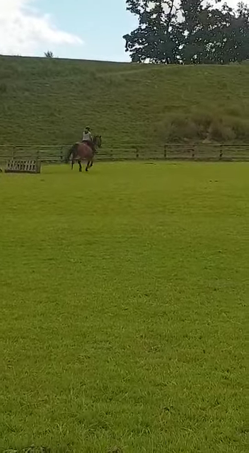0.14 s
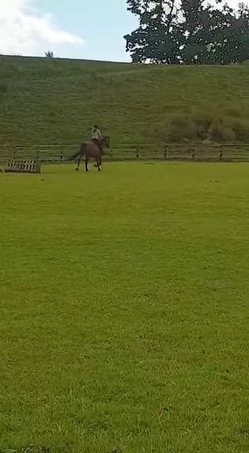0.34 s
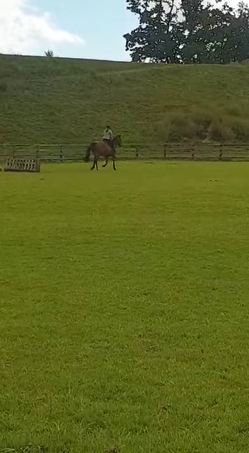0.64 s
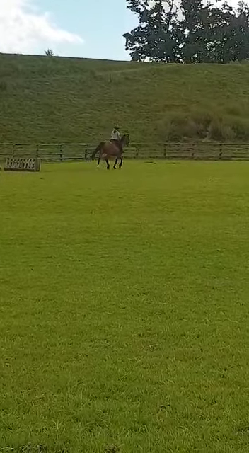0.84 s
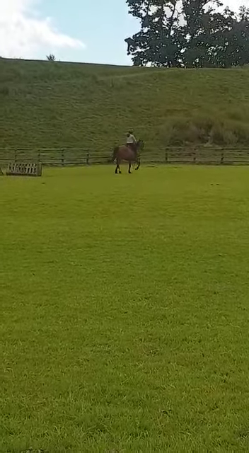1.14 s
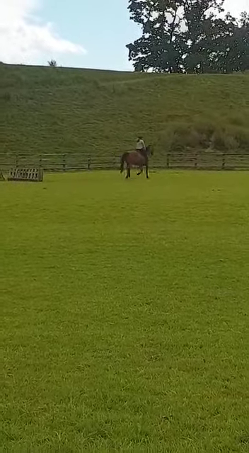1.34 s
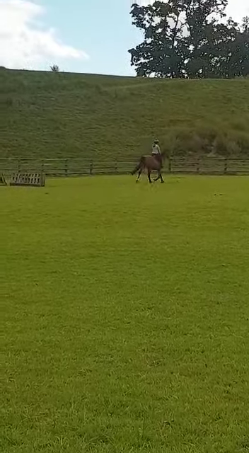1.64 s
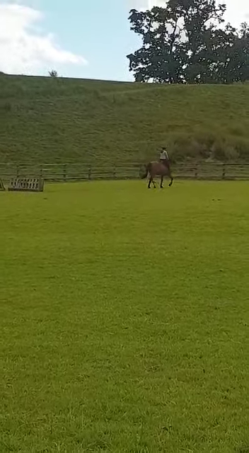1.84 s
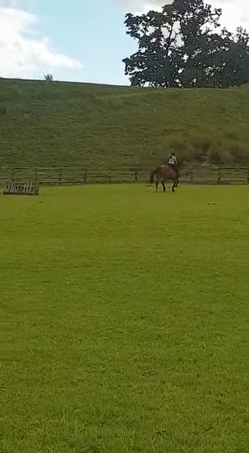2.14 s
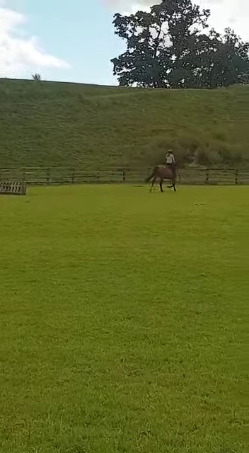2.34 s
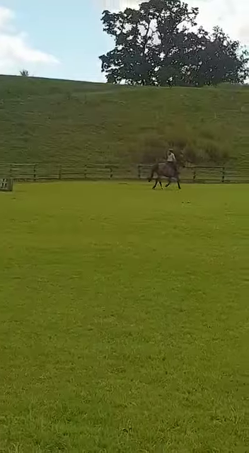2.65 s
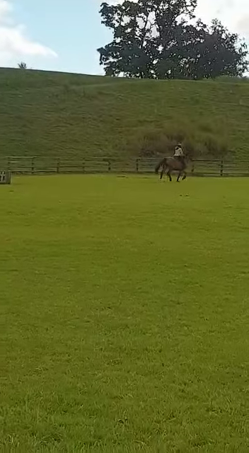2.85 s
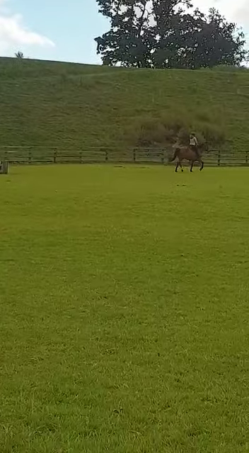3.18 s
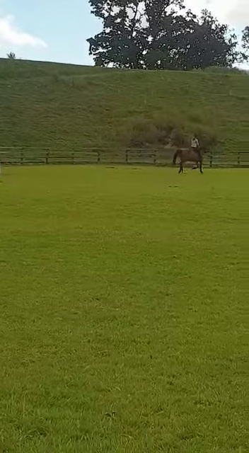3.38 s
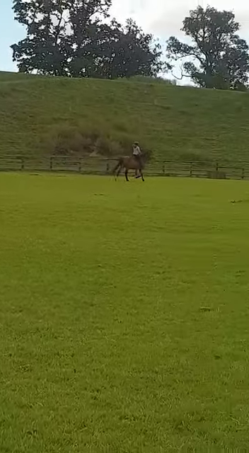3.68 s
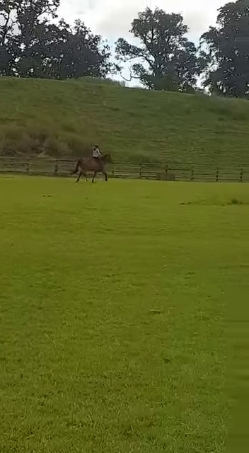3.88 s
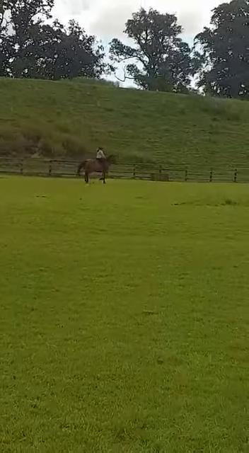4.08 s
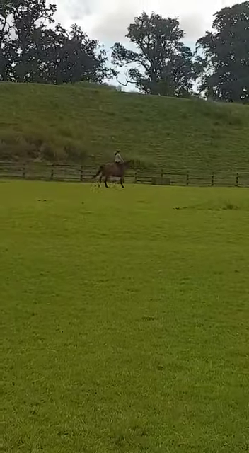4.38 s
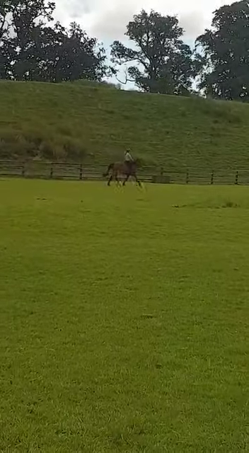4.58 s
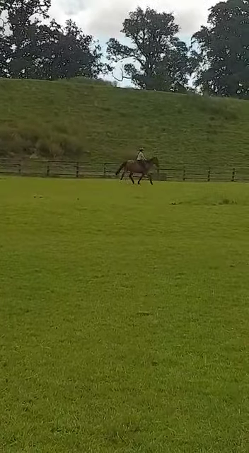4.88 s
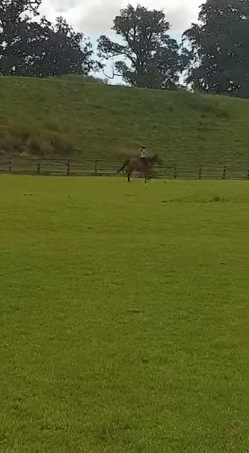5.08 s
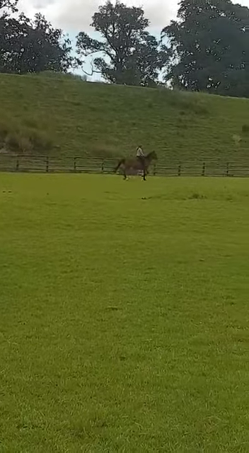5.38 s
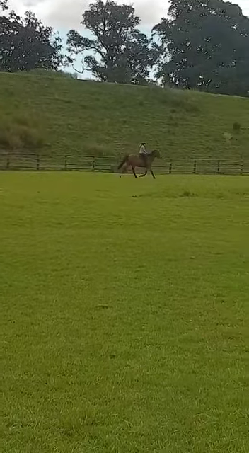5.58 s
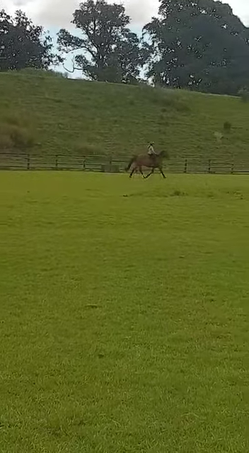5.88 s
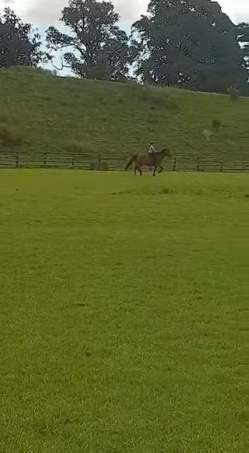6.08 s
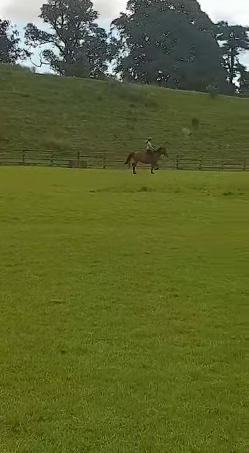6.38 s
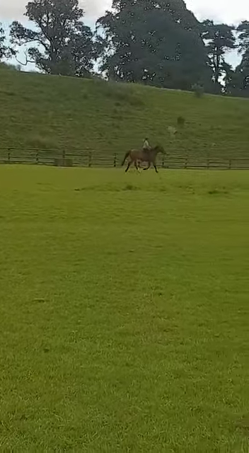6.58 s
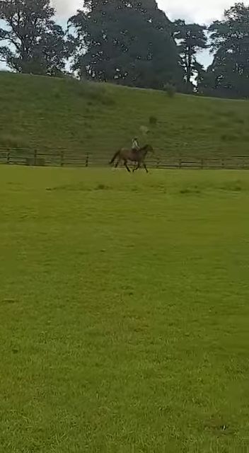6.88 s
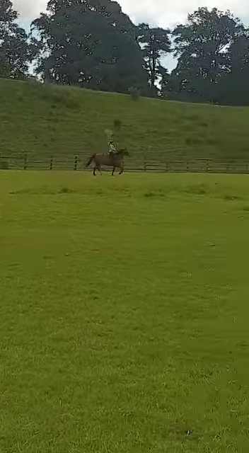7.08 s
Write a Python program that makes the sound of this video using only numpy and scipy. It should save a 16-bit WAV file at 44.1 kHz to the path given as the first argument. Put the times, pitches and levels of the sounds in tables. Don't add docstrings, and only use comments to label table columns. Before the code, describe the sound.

Open-field air roars softly over deep rumble while birds tsip and trill, a distant vehicle pulls away, and a sleeve scuffs the microphone.

```python
import sys
import numpy as np
from scipy import signal
from scipy.fft import rfft, irfft, next_fast_len
from scipy.io import wavfile
from scipy.ndimage import uniform_filter1d, map_coordinates

SR = 44100
rng = np.random.default_rng(int(sys.argv[2]) if len(sys.argv) > 2 else 0)


def generate_wav(sig):
    pcm = np.round(np.clip(np.atleast_2d(sig).T, -1, 1) * 32767).astype(np.int16)
    wavfile.write(sys.argv[1], SR, pcm)


def magnitude_from_level(level_db):
    exponent = np.asarray(level_db, float) / 20
    return 10 ** exponent


N = 318843

# freq_hz, level_db_per_hz
RUMBLE = [(11, -51), (18, -33), (31, -17), (42, -8), (58, -2.5), (72, -0.5), (97, -9), (130, -16.5),
          (170, -39), (290, -120)]
BODY = [(56, -27.5), (95, -1.5), (130, -4), (204, -3.5), (247, -12), (301, -12.5), (392, -15), (480, -13),
        (620, -40.5), (1060, -120)]
RUSH = [(240, -40.5), (400, -18), (450, -13.5), (550, -1), (656, 2.5), (768, 4.5), (960, -2.5), (1250, -24),
        (2110, -120)]
UPPER = [(560, -45), (850, -10), (960, -2.5), (1050, 0), (1300, -6), (1800, -13), (2070, -18), (2330, -28),
         (2600, -37.5), (3300, -66)]
# freq_hz, level_db_per_hz
LEAVES = [(1900, -38.5), (2350, -6.5), (2550, -2.5), (2750, -1), (2950, -5.5), (3200, -17.5), (3600, -21),
          (4500, -62)]
# colour, plain_db, growth_db_per_db of wind, gust_db, patch_db
AIR_LAYERS = [
    (RUMBLE, -45.5, .2, .3, .8),
    (BODY, -50.5, .25, .2, .6),
    (RUSH, -43.5, 1.05, .3, .7),
    (UPPER, -49, .4, .3, .6),
    (LEAVES, -77, .9, .3, 1.2),
]
# freq_hz, left_right_likeness
FAR_ALIKE = [(60, .995), (170, .99), (340, .93), (690, .96), (1030, .9), (1550, .84), (2050, .74),
             (2450, .3), (3500, .2), (6000, .08)]
# freq_hz, left_minus_right_db
FAR_LEAN = [(60, 1.9), (200, -0.5), (400, 6.5), (700, 1.5), (860, -1), (1050, 4), (1600, 1), (2200, 5),
            (2580, 11.5), (3000, 5), (5000, 3.5)]
# time_s, level_db
WIND = [(0, -43), (.6, -43.5), (1.2, -45), (1.7, -47), (2.05, -46), (2.5, -44), (3, -44.5), (3.4, -44.5),
        (3.75, -41.5), (4.15, -44.5), (4.8, -43.5), (5.1, -42), (5.42, -41), (5.75, -41), (6.05, -43.5),
        (6.7, -45.5), (7.23, -45.5)]
# centre_s, length_s, level_db
BOUGHS = [
    (0.023, 0.22, -84),
    (.4, 0.23, -75),
    (1.17, 0.96, -82),
    (3.12, 0.22, -71),
    (3.28, 0.14, -73),
    (3.8, 0.28, -82),
    (5.25, 0.34, -70.5),
    (5.519, 0.066, -81),
    (5.84, 0.1, -76.5),
]

# time_s, firing_hz, level_db
ENGINE = [(0, 62.9, -57), (.4, 62.1, -44), (.7, 59.63, -52), (.95, 61.23, -43.5), (1.5, 60.55, -42),
          (1.75, 60.6, -60), (2.5, 59.6, -52), (3, 59.86, -42), (3.7, 61.7, -48.5), (4.1, 56.8, -48),
          (4.6, 51.06, -71), (4.8, 51.76, -42.5), (5.16, 54.4, -37), (5.75, 67.2, -47), (6.05, 69.43, -51),
          (6.2, 69.86, -38), (6.5, 73.1, -43), (6.7, 75.4, -56)]
# centre_s, length_s, firing_hz, level_db
ENGINE_SWELLS = [
    (2.635, 0.16, 73, -38),
    (7.084, 0.45, 64, -42.5),
]
# freq_hz, level_db_per_hz
TYRES = [(380, -42.5), (500, -8), (600, -2), (690, 4), (800, -4.5), (900, -16), (1200, -23.5),
         (2050, -24.5), (2400, -45.5), (3500, -120)]

# freq_hz, level_db_per_hz
CLOTH_BRIGHT = [(4410, -33), (7500, -18.5), (9530, -12), (10800, -4.5), (11900, -6.5), (12900, -1),
                (15000, 0), (15800, -11)]
# freq_hz, level_db_per_hz
CLOTH_DULL = [(1410, -19.5), (2100, 0.5), (3260, -7.5), (4270, -7), (6090, -2.5), (8500, -16),
              (11000, -35.5), (18700, -120)]
# freq_hz, level_db_per_hz
SCRAPE = [(900, -40), (1600, -1), (2500, -3), (4000, 1), (5500, -10), (8000, -40)]
# hardest_s, level_db, rise_s, fall_s, drag_over_level_db
STROKES = [(1.23, -81, .14, 0.11, -4), (2.8, -85, 0.067, 0.14, 0), (2.96, -68.5, 0.099, 0.14, 1),
           (3.5, -81, 0.29, 0.23, 0), (3.64, -56.5, 0.15, 0.072, 0.5), (3.73, -69.5, 0.086, .2, -4),
           (3.9, -67, 0.13, 0.26, -1), (3.99, -65, 0.07, .1, -4), (4.032, -48.5, 0.018, 0.05, -4),
           (4.053, -47.5, 0.05, 0.035, -1), (4.068, -48.5, 0.03, 0.016, 4), (4.1, -66, .03, 0.11, -1),
           (6.724, -71.5, 0.12, 0.47, 0), (6.97, -61, 0.02, 0.22, 3.5), (7.01, -64, .08, 0.1, 4.5),
           (7.046, -55.5, 0.025, 0.025, -4), (7.228, -68.5, 0.006, 0.051, 0)]
# peak_s, peak_db
SNAGS = [(1.1518, -61.0), (1.1847, -60), (1.2155, -58), (1.1985, -65), (1.2245, -61), (1.258, -64),
         (1.2382, -58), (1.2407, -56), (3.0544, -65.0), (3.0657, -64.0), (3.3272, -67), (3.3324, -64),
         (3.6944, -53), (3.7066, -53), (3.725, -52), (3.7355, -55), (4.0695, -33), (4.4246, -69.0),
         (6.1246, -67), (6.1262, -69), (6.9074, -61.0), (6.9088, -64.5), (6.9675, -43), (7.0457, -42.5),
         (7.0946, -56), (7.189, -61.5), (7.2278, -46.5), (7.2299, -54.0)]
# start_s, peak_db, pitch_hz, left_minus_right_db
TICKS = [(.131, -74, 6000, 5), (1.152, -82, 7000, 0), (6.1259, -58.5, 4100, 4), (6.134, -78, 5300, 3),
         (6.141, -78, 5100, 3), (6.1706, -73, 6790, 3), (6.2058, -76, 5000, 2), (6.208, -74, 4170, 3),
         (6.9063, -79, 6270, 3), (6.969, -71, 5850, -7), (7.2275, -69, 6500, -6)]

# start_s, peak_db, pitch_hz
TSIPS = [(0.0164, -65, 5600), (0.1146, -63, 5600), (0.3157, -68, 5640), (0.6993, -65.5, 5620),
         (1.257, -69, 5700), (1.5953, -71, 5410), (2.3565, -64, 5616), (2.4578, -67, 5520),
         (2.6803, -65.5, 5560), (2.9457, -64, 5720), (3.472, -67, 5540), (3.681, -64, 5910),
         (3.7559, -72, 5450), (4.2467, -71, 5640), (5.033, -71, 5600), (5.539, -68, 5780),
         (5.9085, -73, 5640), (6.0427, -72, 5410), (6.108, -71, 5900), (6.6877, -69, 5620),
         (1.145, -72, 5600),
    (4.17, -71, 5500),
    (4.9472, -79, 5526),
    (5.616, -72.5, 5700),
    (5.6974, -72, 5500),
]
# start_s, peak_db, pitch_hz
CHIPS = [(.0623, -71, 5600), (.205, -69, 5480), (0.5881, -64.5, 5500), (1.047, -70, 5570),
         (2.143, -63.5, 5650), (2.2648, -63, 5580), (3.0814, -61, 5650), (3.2066, -65.5, 5550),
         (3.4048, -64, 5580), (3.5733, -61, 5550), (4.396, -64, 4880), (6.5655, -70, 5510)]
# start_s, peak_db, pitch_hz
WHIPS = [
    (0.5524, -70, 4800.0),
    (1.0724, -75, 4770),
    (1.144, -66, 4720),
    (1.192, -69, 4550),
    (1.542, -70.5, 4800),
    (2.4964, -67.5, 4960),
    (3.2106, -69, 4720),
    (3.436, -70, 4820),
    (4.6724, -65, 4820),
]
# start_s, peak_db, pitch_hz
DIPS = [
    (3.356, -68, 5650),
    (4.39, -70, 5000),
    (1.467, -71.5, 5500),
]
# start_s, peak_db, pitch_hz
SLURS = [
    (.093, -68, 6430),
    (.218, -65, 5300),
    (1.96, -66, 6400),
    (2.085, -65, 5290),
    (2.722, -66.5, 6160),
    (5.126, -70, 6600),
]
# start_s, peak_db, pitch_hz
LOW_SLURS = [(.645, -73, 4050), (1.245, -73, 4036), (1.628, -74, 4050), (2.58, -70, 4110),
             (3.298, -70, 4000), (3.532, -63, 3980), (5.236, -68, 5033), (5.728, -71, 3994),
             (5.882, -73.5, 4740), (6.255, -83, 7750)]
# calls, length_s, rise_hz, bend_exponent, peak_lateness_exponent
CALL_SHAPES = [
    (TSIPS, .011, 550, .6, .9),
    (CHIPS, .0095, -140, .9, .7),
    (WHIPS, .024, 2100, .7, .75),
    (DIPS, .012, -500, .9, .8),
    (SLURS, .028, 1000, 1.05, 1.4),
    (LOW_SLURS, .023, 750, .9, 1.1),
]
# start_s, length_s, pitch_hz, width_hz, level_db
TRILLS = [(0.253, 0.027, 8050, 300, -95), (.385, .035, 8600, 500, -94), (.52, .035, 8800, 500, -95),
          (.63, .035, 8300, 497, -91), (.695, 0.033, 8400, 400, -89), (.925, 0.027, 8100, 394, -93),
          (0.861, 0.16, 3900, 150, -90), (3.3, 0.42, 2680, 260, -75.5), (6.03, 0.091, 5590, 300.4, -95),
          (1.16, 0.055, 4400, 700, -77), (.75, .05, 8400, 900, -95), (1.29, .025, 8200, 300, -96),
          (.12, .06, 5600, 500, -88), (.26, .1, 5500, 700, -89), (5.26, .07, 5300, 600, -87),
          (1.52, .05, 8120, 400, -95), (1.828, 0.058, 7670, 404, -98), (2.202, 0.16, 6840, 300, -80),
          (2.261, 0.11, 7400, 299.6, -90), (4.347, 0.086, 5290, 885, -83.5), (4.58, .22, 5130, 80, -89),
          (4.68, .07, 8000, 400, -94), (5.05, .1, 7600, 200, -97), (5.05, .55, 3200, 600, -84.5),
          (3.56, .09, 3900, 250, -83), (3.59, 0.063, 6700, 399, -83), (1.42, .04, 8150, 300, -97),
          (4.639, 0.11, 7780, 503, -95), (4.822, .15, 7720, 298.8, -90), (5.002, 0.12, 7640, 200, -99),
          (5.217, 0.19, 7040, 349, -77), (5.223, 0.16, 7890, 399, -94), (5.625, .15, 4570, 60, -85.5)]

# freq_hz, level_db_per_hz
FLOCK = [(4200, -40), (4900, -9), (5500, 0), (6100, -8), (7000, -40)]
# freq_hz, level_db_per_hz
HEDGE = [(1880, -20.5), (3200, -2), (4270, -9.5), (5380, -9.5), (7500, -24.5), (9750, -49), (16500, -120)]
# freq_hz, level_db_per_hz
HISS = [(3820, -25), (6500, -7.5), (8720, -13.5), (12000, 0.5), (15100, 1), (15800, -2)]

FAR_LEAD_S = -6.5e-5
CLOTH_LAG_S = 4.42e-4
SNAP_RISE_S = .0003
CLOTH_PATCH_DB = .8


def unit(x):
    return x / np.sqrt(np.mean(x ** 2) + 1e-20)


def along(points, hz):
    f, v = np.transpose(points)
    return np.interp(np.log(hz + 1), np.log(f + 1), v)


def curves(rows):
    s, *cols = np.transpose(rows)
    return [np.interp(np.arange(N) / SR, s, c) for c in cols]


def wobble(knots_per_s):
    knots = rng.standard_normal(int(N * knots_per_s / SR) + 4)
    return map_coordinates(knots, [np.arange(N) * knots_per_s / SR])


def bump(t, centre_s, length_s):
    return np.exp(-(2 * (t - centre_s) / length_s) ** 2)


def filtered(x, response):
    m = next_fast_len(N + SR // 2)
    return irfft(rfft(x, m) * response(np.fft.rfftfreq(m, 1 / SR)), m)[..., :N]


def ports(hz, lean_db, lag_s):
    half = np.array([[.5], [-.5]])
    return magnitude_from_level(half * lean_db) * np.exp(-2j * np.pi * hz * half * lag_s)


def rush(spectrum, alike, lean, lag_s, patch_db):
    z = signal.stft(rng.standard_normal((2, N + 512)), nperseg=512)[2]
    field = uniform_filter1d(rng.standard_normal(z.shape[1:]), size=6, axis=0)
    field = uniform_filter1d(field, size=14, axis=1)
    pair = signal.istft(z * magnitude_from_level(patch_db * unit(field)), nperseg=512)[1][:, :N]

    def mid_side(hz):
        turn = np.arccos(np.clip(along(alike, hz), -1, 1)) / 2
        return magnitude_from_level(along(spectrum, hz)) * np.array([np.cos(turn), np.sin(turn)])

    mid, side = filtered(pair, mid_side)
    left_right = np.array([mid + side, mid - side])
    return unit(filtered(left_right, lambda hz: ports(hz, along(lean, hz), lag_s)))


def snap():
    u = np.arange(SR // 400) / SR / SNAP_RISE_S
    return u * np.exp(1 - u)


def trees(x, wet_db):
    t = np.arange(SR // 3) / SR
    tail = rng.standard_normal((2, len(t))) * magnitude_from_level(-60 * t / 0.41) * (1 - np.exp(-t / 0.008))
    tail = tail / np.linalg.norm(tail[0])
    blur = unit(uniform_filter1d(rng.standard_normal((2, len(x))), size=45))
    direct = x * (.9 + .25 * blur[0])
    blurred = x * (.65 + .75 * blur[1])
    answer = signal.fftconvolve(blurred[None], tail, axes=1)
    return np.pad(direct, (0, len(t) - 1)) + magnitude_from_level(wet_db) * answer


def air():
    calm_db = -44
    strength_db = curves(WIND)[0] - calm_db
    gust, t = wobble(6.5), np.arange(N) / SR
    boughs = sum(magnitude_from_level(db) * bump(t, s, length_s) for s, length_s, db in BOUGHS)
    out = 0
    for colour, plain_db, growth, gust_db, patch_db in AIR_LAYERS:
        gain = magnitude_from_level(plain_db + growth * strength_db)
        if colour is LEAVES:
            gain = gain + boughs
        out = out + gain * magnitude_from_level(gust_db * gust) * rush(colour, FAR_ALIKE, FAR_LEAN, FAR_LEAD_S, patch_db)
    return out


def engine():
    hz, db = curves(ENGINE)
    t = np.arange(N) / SR
    level = magnitude_from_level(db + 1.5 * wobble(17))
    tone = level * np.sin(2 * np.pi * np.cumsum(hz + 0.76 * wobble(14)) / SR)
    for s, length_s, firing_hz, swell_db in ENGINE_SWELLS:
        tone = tone + magnitude_from_level(swell_db) * bump(t, s, length_s) * np.sin(2 * np.pi * firing_hz * t)
    return tone * magnitude_from_level([[.3], [-.3]])


def tyres():
    swell = bump(np.arange(N) / SR, centre_s=5.39, length_s=0.75)
    return magnitude_from_level(-41.5) * swell * rush(TYRES, FAR_ALIKE, FAR_LEAN, FAR_LEAD_S, patch_db=.8)


def stroke_forces():
    t, pressure, drag, rounded = np.arange(N) / SR, 0, 0, .13
    for s, db, rise_s, fall_s, drag_db in STROKES:
        away = np.where(t < s, (s - t) / rise_s, (t - s) / fall_s)
        stroke = magnitude_from_level(db + 70 - 20 * (np.hypot(away, rounded) - rounded))
        pressure = pressure + stroke
        drag = drag + magnitude_from_level(drag_db) * stroke
    return pressure, drag


def weave():
    crackles_per_s, crackle_db = 900, -19
    sizes_db = crackle_db + 3.5 * np.minimum(rng.exponential(size=N), 2.5)
    sizes = (rng.random(N) < crackles_per_s / SR) * magnitude_from_level(sizes_db)
    friction = magnitude_from_level(.6 * wobble(60) + 0.82 * wobble(400))
    gain = friction * (0.83 + np.convolve(sizes, snap())[:N])
    return np.abs(filtered(gain, lambda hz: ports(hz, 0, CLOTH_LAG_S)))


def sleeve():
    bright_lean = [(7500, -16), (8500, -16.5), (11000, -22.5), (15000, -24.5)]
    dull_lean = [(3000, 0.5), (5000, 2.5), (7000, -9.0), (8500, -14.5)]
    bright = rush(CLOTH_BRIGHT, [(9000, .98)], bright_lean, CLOTH_LAG_S, CLOTH_PATCH_DB)
    dull = rush(CLOTH_DULL, [(5000, 0.62)], dull_lean, 0.000474, CLOTH_PATCH_DB)
    scrape = rush(SCRAPE, [(3000, 0.92)], [(3000, -2)], CLOTH_LAG_S, CLOTH_PATCH_DB)
    pressure, drag = stroke_forces()
    t = np.arange(N) / SR
    late_drag = np.interp(t - .003, t, drag)
    out = magnitude_from_level(-71.1) * pressure * bright
    out = out + magnitude_from_level(-75) * late_drag ** 0.72 * dull
    out = out + magnitude_from_level(-104) * pressure ** 1.3 * scrape
    return out * weave()


def snags():
    out, shape = np.zeros(N + SR), snap()
    t = np.arange(len(shape)) / SR
    for s, db in SNAGS:
        pitch_hz = 14300 * (1 + .03 * rng.standard_normal())
        ping = np.sin(2 * np.pi * pitch_hz * t) + .6 * rng.standard_normal(len(t))
        start = round((s - SNAP_RISE_S + CLOTH_LAG_S / 2) * SR)
        out[start:][:len(t)] += magnitude_from_level(db - 3.5) * shape * ping

    def response(hz):
        lean_db = along([(11000, -15), (14500, -10)], hz)
        return magnitude_from_level(along(CLOTH_BRIGHT, hz)) * ports(hz, lean_db, CLOTH_LAG_S)

    return filtered(out[:N], response)


def ticks():
    out, t = np.zeros((2, N + SR)), np.arange(SR // 8) / SR
    for s, db, hz, lean_db in TICKS:
        decay = 0.14 * magnitude_from_level(-60 * t / 0.013) + 0.04 * magnitude_from_level(-60 * t / .33)
        rattle = decay * rng.standard_normal((2, len(t)))
        creak = magnitude_from_level(-60 * t / 0.0018) * np.sin(2 * np.pi * hz * t) + rattle
        out[:, round(s * SR):][:, :len(t)] += magnitude_from_level(db + 23.0 + lean_db * np.array([[.5], [-.5]])) * creak

    def case(hz):
        resonance = 1j * hz * 6000 / (5500 ** 2 - hz * hz + 1j * hz * 6000)
        return resonance / (1 + (hz / 7300) ** 7)

    return filtered(out[:, :N], case)


def whistles(flutter):
    out = np.zeros((2, N + SR))
    for calls, length_s, rise_hz, bend, late in CALL_SHAPES:
        u = np.arange(round(length_s * SR)) / (length_s * SR)
        envelope = np.abs(np.sin(np.pi * u ** late)) ** 0.35
        for s, db, pitch_hz in calls:
            start = round(s * SR)
            level = magnitude_from_level(db - 7.5 + 2 * flutter[start:][:len(u)])
            hz = pitch_hz + rise_hz * (u ** bend - .55)
            call = level * envelope * np.sin(2 * np.pi * np.cumsum(hz) / SR)
            heard = trees(call, wet_db=-2.5)
            out[:, start:][:, :heard.shape[1]] += heard
    return out[:, :N]


def trills(flutter):
    t, out = np.arange(N) / SR, 0

    def bands(f):
        return [1 / (1 + np.abs(2 * (f - hz) / width_hz) ** 2.7) for _, _, hz, width_hz, _ in TRILLS]

    buzz = filtered(rng.standard_normal((len(TRILLS), N)), bands)
    for (s, length_s, _, _, db), tone in zip(TRILLS, buzz):
        swell = np.sin(np.pi * np.clip((t - s) / length_s, 0, 1))
        out = out + magnitude_from_level(db + 1.9 * flutter) * swell * unit(tone)
    return trees(out, wet_db=-6)[:, :N]


def birds():
    flutter = wobble(250)
    return filtered(whistles(flutter) + trills(flutter), lambda hz: ports(hz, 11.6, -0.0002))


def flock():
    leaves_s = 3.8
    near_db = -6 * (np.arange(N) / SR > leaves_s) + 3 * wobble(25)
    return magnitude_from_level(-95.5 + near_db) * rush(FLOCK, [(5500, .3)], [(5500, 9)], 0, patch_db=2.5)


def hedge():
    return magnitude_from_level(-79.5 + 0.35 * wobble(2.2)) * rush(HEDGE, FAR_ALIKE, FAR_LEAN, 0, patch_db=1.5)


def hiss():
    return magnitude_from_level(-79) * rush(HISS, [(9000, .02)], [(7000, 3.2), (15000, 1.1)], 0, CLOTH_PATCH_DB)


def scene():
    traffic = engine() + tyres()
    handling = sleeve() + snags() + ticks()
    return air() + traffic + handling + birds() + flock() + hedge() + hiss()


def low_pass(x):
    return signal.sosfilt(signal.butter(12, 15770, fs=SR, output="sos"), x)


def record(dry):
    mix = filtered(dry, lambda hz: hz < 15850)
    return low_pass(mix)


dry = scene()
out = record(dry)
generate_wav(out)
```